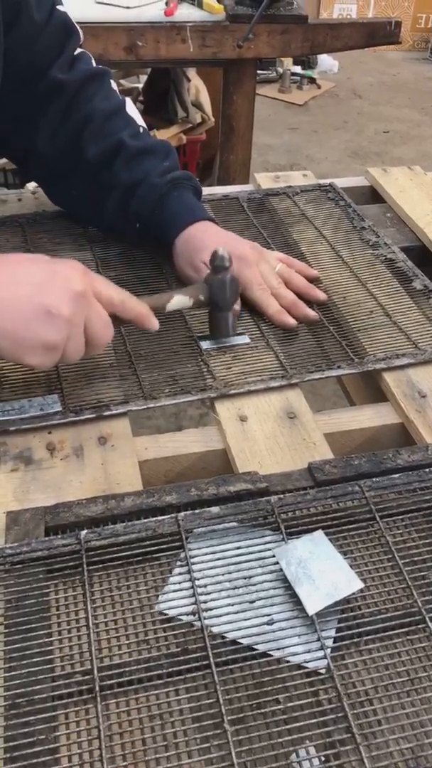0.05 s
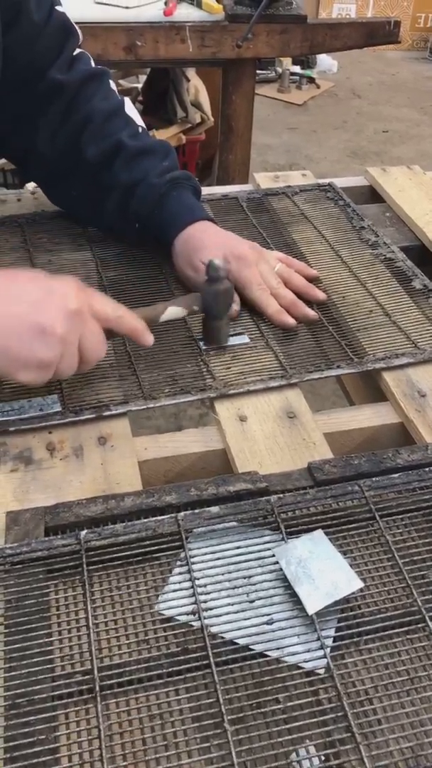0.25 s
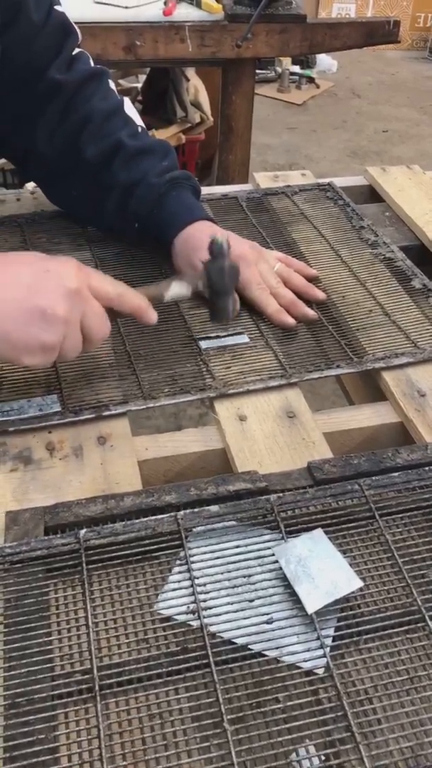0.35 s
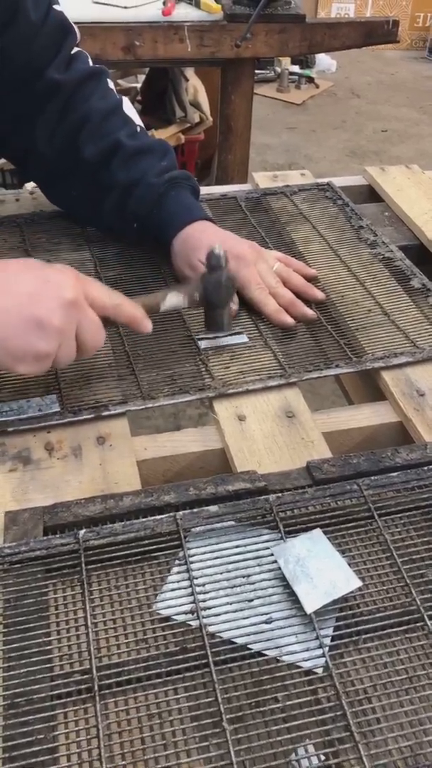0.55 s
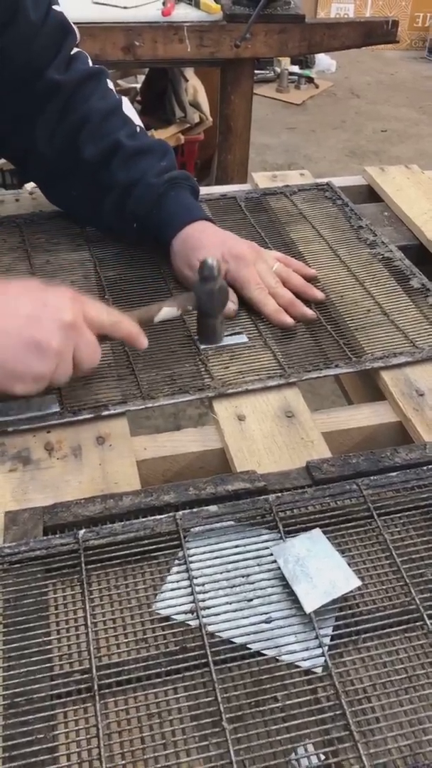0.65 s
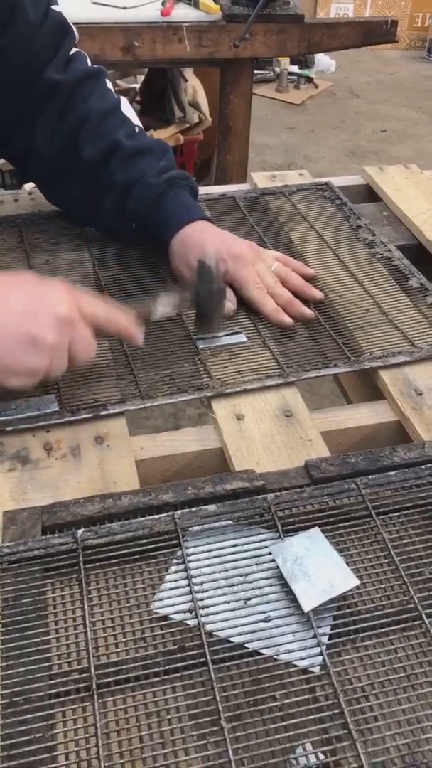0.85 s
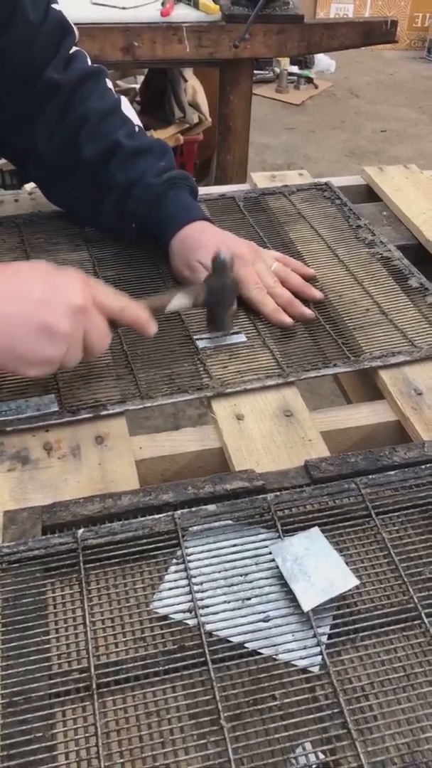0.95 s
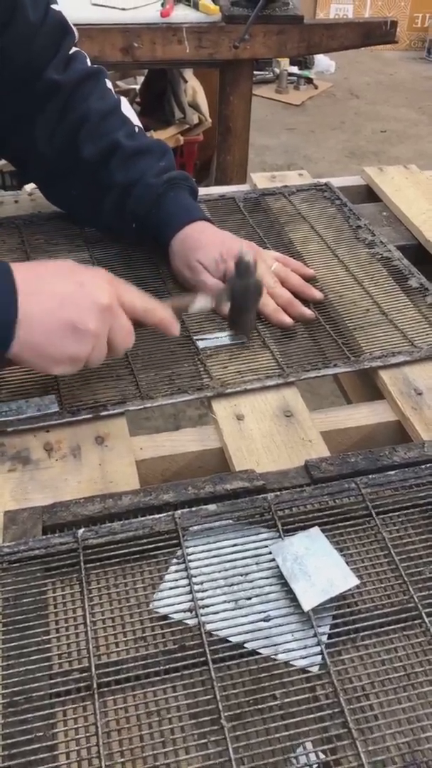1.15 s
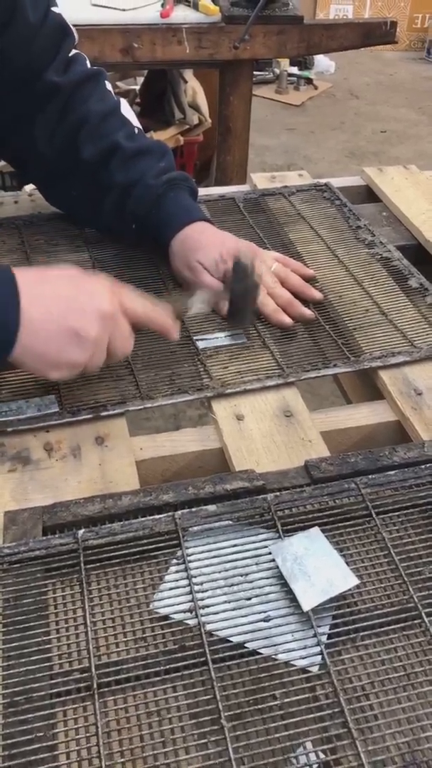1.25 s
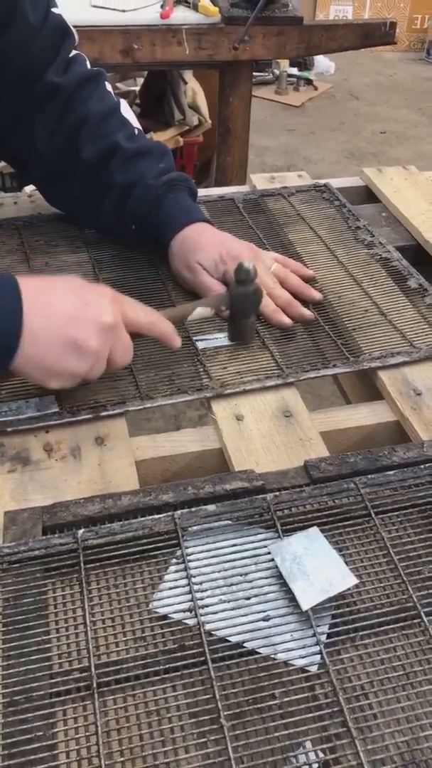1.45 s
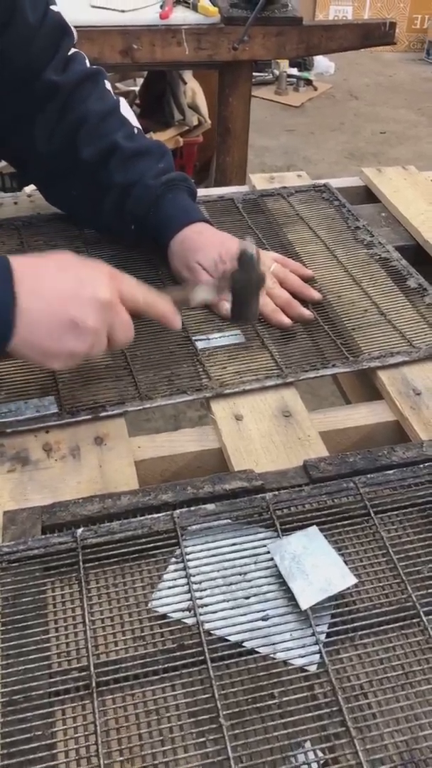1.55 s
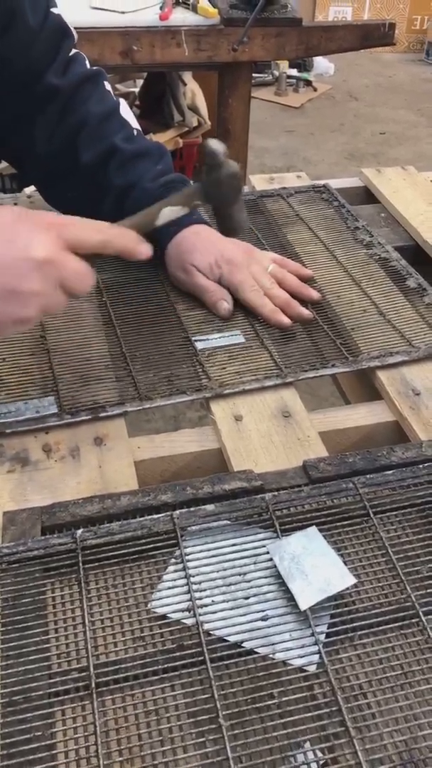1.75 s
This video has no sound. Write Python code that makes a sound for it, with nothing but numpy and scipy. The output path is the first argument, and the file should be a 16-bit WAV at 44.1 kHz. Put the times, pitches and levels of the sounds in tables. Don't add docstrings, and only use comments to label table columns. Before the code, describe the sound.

Hammer blows on thin sheet metal over a wire grid. The tail of one weak blow opens, then bright hard ticks come near 0.23, 0.47, 0.69, 0.9, 1.11, 1.3 and 1.48 seconds, slightly quickening and strengthening. Each brings a dense metallic clatter and short wooden thump; wires shiver and ring between. The last tick is softer, its slam duller, fading into reverberant workshop hum until the end.

```python
import sys
import numpy as np
from scipy import signal
from scipy.io import wavfile

SR = 44100
rng = np.random.default_rng(int(sys.argv[2]) if len(sys.argv) > 2 else 0)


def attenuation_scalar(level_db):
    decades = np.asarray(level_db, float) / 20
    return 10 ** decades


def waveform_to_disk(signal):
    frames = np.transpose(np.atleast_2d(signal))
    scaled = np.clip(frames, -1, 1) * 32767
    samples = np.round(scaled).astype(np.int16)
    wavfile.write(sys.argv[1], SR, samples)


N = 79380
LEAD = SR // 10


def clock():
    return (np.arange(N + LEAD) - LEAD) / SR


def at_hz(points, hz):
    table = np.array(points)
    return np.interp(np.log(hz), np.log(table[:, 0]), table[:, 1])


def clicks_at(times_s, gains):
    out = np.full(N + LEAD, 1e-18)
    np.add.at(out, (np.asarray(times_s) * SR).astype(int) + LEAD, gains)
    return out


def ring(clicks, hz, t60):
    r = attenuation_scalar(-60 / (t60 * SR))
    w = 2 * np.pi * hz / SR
    return signal.lfilter([0, np.sin(w)], [1, -2 * r * np.cos(w), r * r], clicks)


def grains(per_s, sizes_db):
    n = N + LEAD
    sizes = attenuation_scalar(sizes_db * np.minimum(rng.exponential(1, n), 2.5))
    x = sizes * rng.choice([-1, 1], n) * (rng.random(n) < per_s / SR)
    return x / x.std()


EDGES = 36 * 2 ** np.arange(0, 8.9, 1 / 3)


def coloured(sources, spectrum, envelope):
    centres = np.sqrt(EDGES[1:] * EDGES[:-1])
    gains = attenuation_scalar(at_hz(spectrum, centres)) * (centres > spectrum[0][0])
    gains = gains / np.sqrt(np.sum(gains ** 2 * np.diff(EDGES)) * 2 / SR)
    out = 0
    for k, (hz, gain) in enumerate(zip(centres, gains)):
        band = signal.butter(2, EDGES[k:k + 2], "band", fs=SR, output="sos")
        out = out + gain * signal.sosfilt(band, sources[k % 2] * envelope(hz) + 1e-18)
    return out


BLOW_S = [-.025, .2343, .4746, .6884, .8984, 1.1077, 1.2976, 1.4832]
SLAM_S = [-.02, .2395, .4784, .6914, .9001, 1.1122, 1.3006, 1.4835]
# level in dB, brightness in dB per octave, hold in seconds, tail level in dB.
SLAMS = [
    (-24.5, 1.14, 0.013, 6.5),
    (-15, 1, 0.0097, -1.5),
    (-13, 1.5, 0.0049, -3.5),
    (-11.5, 1.37, 0.0093, -1),
    (-10, 1.28, 0.0099, -0.05),
    (-9.5, 1.5, 0.0064, -2),
    (-8, 1.38, 0.0061, -2),
    (-8.5, .1, 0.012, 0),
]
PRESS_DB = -2.5


def dying(hz, t60s, rise_s, rattles):
    t = clock()[::8]
    power = 0
    for s, blow_s, (db, tilt_db, hold, tail_db) in zip(SLAM_S, BLOW_S, SLAMS):
        age = np.maximum(t - s, 0)
        level_db = db + tilt_db * np.log2(hz / 1000)
        waiting = np.exp(-age / rise_s)
        shape = 1 - waiting
        if rattles:
            shape = shape + attenuation_scalar(PRESS_DB) * (t > blow_s) * waiting
            age = np.maximum(age - hold, 0)
        else:
            level_db = level_db + tail_db
        power = power + (attenuation_scalar(level_db - 60 * age / at_hz(t60s, hz)) * shape) ** 2
    return np.interp(clock(), t, np.sqrt(power))


# frequency in Hz, density in dB per Hz.
FLOOR = [(18, -44), (30, -14), (81, 4.5), (526, -4.5), (1070, 3.5), (7270, -29.5), (16000, -13)]


def air():
    return attenuation_scalar(-42) * coloured(rng.standard_normal((2, N + LEAD)), FLOOR, lambda hz: 1)


TAIL_RISE_S = 0.027
# frequency in Hz, density in dB per Hz.
TAIL = [(24, -42), (40, 0.5), (329, 2.5), (615, -5), (1440, -7.5), (5310, -17), (7360, -21.5),
        (14500, -26.5), (16000, -34)]
# frequency in Hz, t60 in seconds.
TAIL_T60 = [(60, .5), (250, 0.32), (1000, 0.63), (3000, 0.55), (12000, 0.41)]
# frequency in Hz, t60 in seconds.
HALL_T60 = [(60, 0.37), (1000, 4.7), (12000, 0.42)]


def shop_tail():
    tail_db, hall_db, patchy_db = -8.5, -20, 0.7

    def envelope(hz):
        flicker = np.interp(clock(), np.linspace(-.1, N / SR, 60), rng.standard_normal(60))
        quick = attenuation_scalar(tail_db) * dying(hz, TAIL_T60, TAIL_RISE_S, False)
        slow = attenuation_scalar(hall_db) * dying(hz, HALL_T60, TAIL_RISE_S, False)
        return np.hypot(quick, slow) * attenuation_scalar(patchy_db * flicker)
    return coloured(rng.standard_normal((2, N + LEAD)), TAIL, envelope)


# peak in seconds, level in dB, rise and fall in seconds.
SHIVERS = [(.008, -40, .02, 0.016), (0.122, -36, 0.02, 0.032), (.19, -38, 0.042, .05),
           (0.331, -33.5, 0.086, 0.073), (.56, -35, 0.08, 0.073), (.79, -34, 0.056, 0.046),
           (.96, -42, .02, 0.046), (1.14, -29, .01, .02), (1.33, -37, .01, .02), (1.505, -41, 0.015, .015),
           (1.6, -43.5, .04, 0.12)]
# frequency in Hz, density in dB per Hz.
SHIVER = [(1470, -36), (2500, 0.5), (3980, -6), (5690, -0.5), (9580, -5), (14600, -7.5), (16000, -18)]


def shiver():
    t = clock()
    level = 0
    for s, db, rise, fall in SHIVERS:
        level = level + attenuation_scalar(db) * np.exp(-((t - s) / np.where(t < s, rise, fall)) ** 2)
    buzz = grains(per_s=4400, sizes_db=2.7)
    return coloured([buzz, buzz[::-1]], SHIVER, lambda hz: level)


WIRE_HZ = [845, 1060, 1210, 1440, 1770, 2300, 2800, 3300, 4330, 5560, 6350, 7250, 7800, 9050]
# width in Hz, level in dB.
WIRES = [(25.4, 9.5), (40, 9.5), (30.2, 9), (30, 7.5), (30, 1.5), (40, 7.5), (30, 6), (40, 5.5), (50, 3.5),
         (40, 3.5), (50, -2), (70, 1.5), (50, -8.5), (60, -9)]
# frequency in Hz, t60 in seconds.
WIRES_T60 = [(800, 1.12), (2500, 0.67), (5000, 0.4), (9000, 0.87)]


def wires():
    out = 0
    for hz, (width, db) in zip(WIRE_HZ, WIRES):
        sung = ring(rng.standard_normal(N + LEAD), hz, 2.2 / width)
        out = out + attenuation_scalar(db - 31.5) * dying(hz, WIRES_T60, TAIL_RISE_S, False) * sung / sung.std()
    return out


# tick level in dB, hammer ring level in dB, thump level in dB.
BLOWS = [
    (-10, -56, -25.5),
    (4.5, -39, -17.5),
    (3, -47, -21.5),
    (-1, -60, -18),
    (6, -45, -19),
    (0.1, -46, -19.5),
    (3, -53, -18),
    (-17, -44, -19.5),
]
# frequency in Hz, level in dB, t60 in seconds.
THUMP = [(80, -10, 0.2), (124, 0.5, 0.056), (209.3, 4, 0.087), (240.6, -6.3, 0.38), (288.4, 1.5, 0.16),
         (340.5, -16, 0.14), (844, -8, 0.35), (1156, -37, 0.24)]


def thump():
    db = np.transpose(BLOWS)[2]
    chance = rng.normal(0, 3.2, (len(db), len(THUMP)))
    out = 0
    for k, (hz, level_db, t60) in enumerate(THUMP):
        out = out + ring(clicks_at(SLAM_S, attenuation_scalar(db + level_db + chance[:, k])), hz, t60)
    return out


# frequency in Hz, density in dB per Hz.
CLATTER = [(24, -40), (40, -8), (283, -0.5), (751, -6), (1070, 0), (2320, -5.5), (4930, -16.5), (8990, -23),
           (16000, -32.5)]
# frequency in Hz, t60 in seconds.
CLATTER_T60 = [(60, 0.29), (250, 0.15), (1000, 0.22), (3000, 0.085), (12000, 0.12)]
KNOCKS_DB = [-39, -24.5, -18.5, -19, -19, -22.5, -22, -18.5]
# frequency in Hz, width in Hz, level in dB.
PANEL = [(77.3, 19, -7.5), (288, 117, 9.5), (527, 16, -7), (1124, 40, 2), (1470, 37, -7.5), (2216, 68, 12),
         (2770, 37, -16), (3270, 144, 1), (3325, 100, -23)]


def clatter():
    knocks = grains(per_s=2500, sizes_db=3.5)
    out = coloured([knocks, knocks[::-1]], CLATTER, lambda hz: dying(hz, CLATTER_T60, 0.00033, True))
    db = np.array(KNOCKS_DB)
    chance = rng.normal(0, 3, (len(db), len(PANEL)))
    for k, (hz, width, level_db) in enumerate(PANEL):
        clicks = clicks_at(SLAM_S, attenuation_scalar(db + level_db + chance[:, k]))
        out = out + (-1) ** k * ring(clicks, hz, 2.3 / width)
    return out


HAMMER_HZ = 13954, 14643
HAMMER_DB = (.1, -1.2)


def hammer_ring():
    db = np.transpose(BLOWS)[1]
    out = 0
    for hz, level_db in zip(HAMMER_HZ, HAMMER_DB):
        out = out + ring(clicks_at(BLOW_S, attenuation_scalar(db + level_db)), hz, t60=0.56)
    return out


# frequency in Hz, level in dB, t60 in seconds.
STRIP = [(4360, 5, 0.0025), (5460, 3.9, 0.0035), (6000, 2.5, 0.0028), (9000, 0, 0.0036),
         (12210, -2.5, 0.0072), (14000, -10, 0.0033), (14900, -4, 0.0033)]
REBOUND_S = [.2374, .266, .2745, .4788, .5137, .692, .7125, .943, 1.1102, 1.136, 1.508]
# level in dB, frequency in Hz, cycles of ring.
REBOUNDS = [(-2, 10000, 8), (-17, 7300, 28), (-7, 3100, 4), (5, 7100, 9.7), (-5, 3000, 5), (-5, 11200, 13),
            (-10, 8000, 10), (-16, 4300, 5), (-1.5, 9400, 36), (-1, 5500, 7.7), (-9, 5900, 31)]


def ticks():
    db = np.transpose(BLOWS)[0] - 17.5
    second_s = np.array(BLOW_S) + .0005
    second_db = 1.5
    chance = rng.normal(0, 4.4, (len(db), len(STRIP), 2))
    out = 0
    for k, (hz, level_db, t60) in enumerate(STRIP):
        first = clicks_at(BLOW_S, attenuation_scalar(db + level_db + chance[:, k, 0]))
        second = clicks_at(second_s, attenuation_scalar(db + second_db + level_db + chance[:, k, 1]))
        out = out + (-1) ** k * ring(first + second, hz, t60)
    for s, (level_db, hz, cycles) in zip(REBOUND_S, REBOUNDS):
        out = out + ring(clicks_at([s], attenuation_scalar(level_db)), hz, cycles / hz)
    return signal.sosfilt(signal.butter(2, 1700, "high", fs=SR, output="sos"), out)


def scene():
    background = air() + shop_tail()
    grid_and_pallet = shiver() + wires() + thump() + clatter()
    hammer_on_strip = hammer_ring() + ticks()
    return (background + grid_and_pallet + hammer_on_strip)[None, LEAD:]


def top_cut(x):
    return signal.sosfilt(signal.butter(12, 16640, fs=SR, output="sos"), x)


def record(dry):
    x = signal.sosfilt(signal.butter(2, 55, "high", fs=SR, output="sos"), dry)
    dip_hz, dip_q, dip_share = 10200, 9, 0.6
    x = x - dip_share * signal.lfilter(*signal.iirpeak(dip_hz, dip_q, fs=SR), x)
    top_cut_hz = 15900
    x = signal.sosfilt(signal.cheby2(8, 30, top_cut_hz * 1.03, fs=SR, output="sos"), x)
    x = x / (1 + np.abs(x) ** 6) ** (1 / 6)
    return top_cut(x)


dry = scene()
out = record(dry)
waveform_to_disk(out)
```